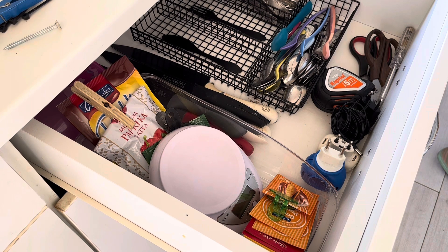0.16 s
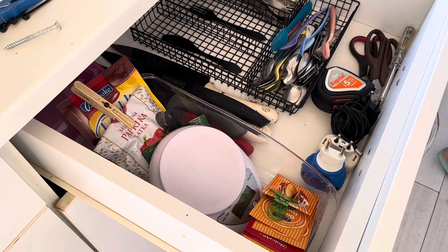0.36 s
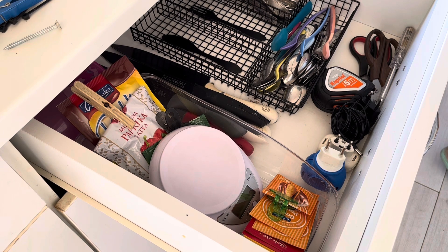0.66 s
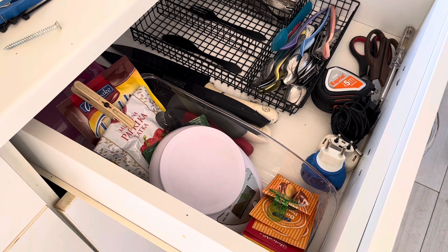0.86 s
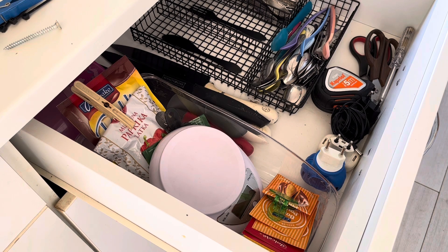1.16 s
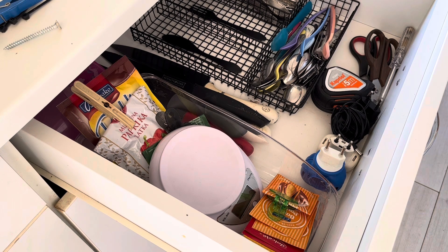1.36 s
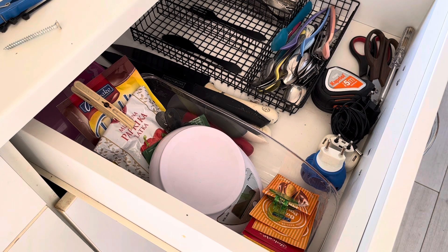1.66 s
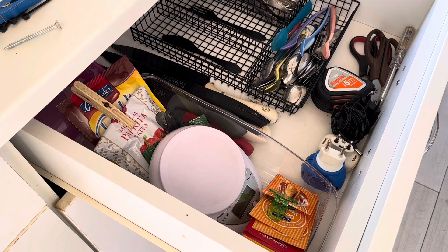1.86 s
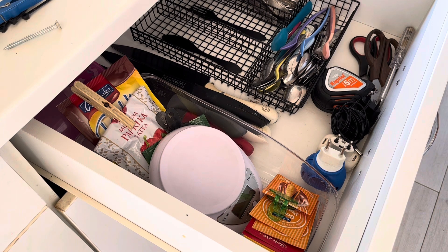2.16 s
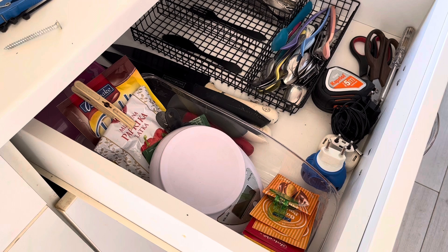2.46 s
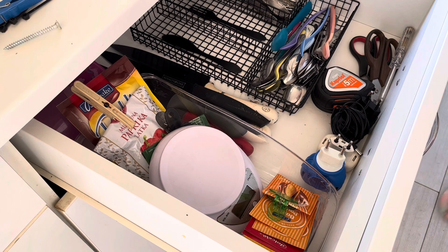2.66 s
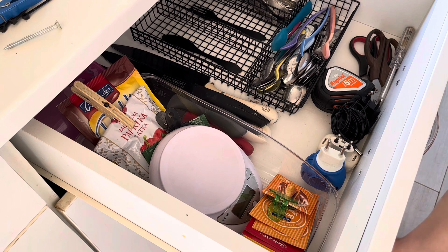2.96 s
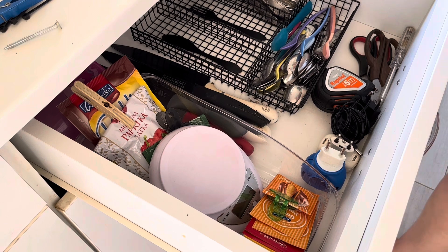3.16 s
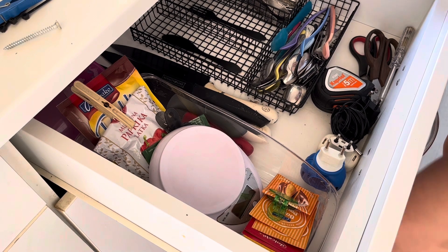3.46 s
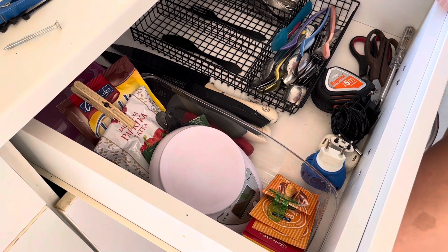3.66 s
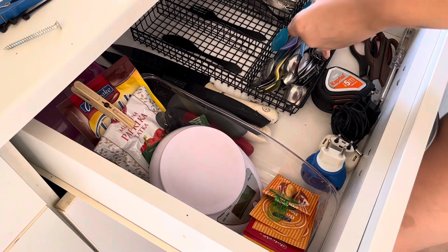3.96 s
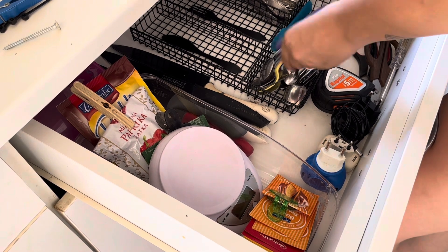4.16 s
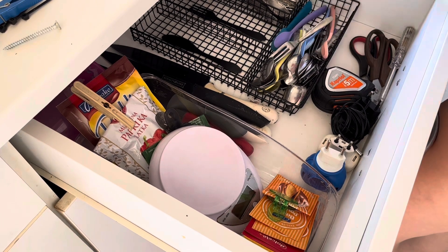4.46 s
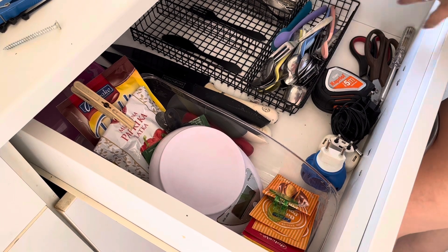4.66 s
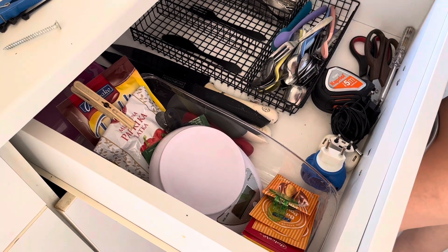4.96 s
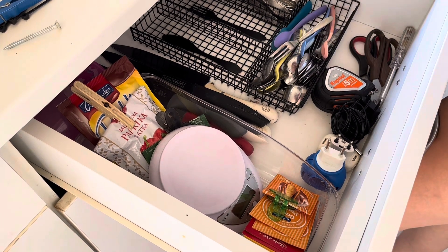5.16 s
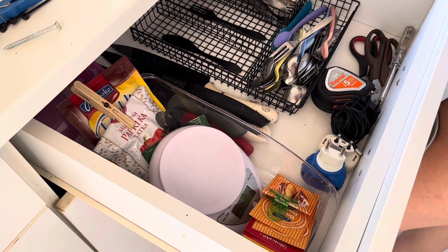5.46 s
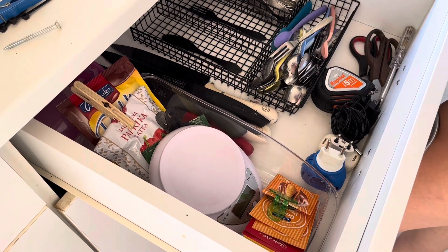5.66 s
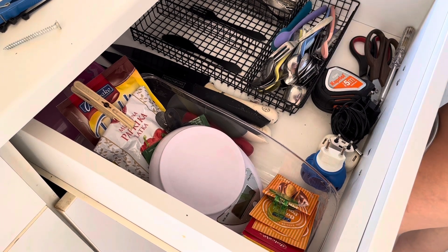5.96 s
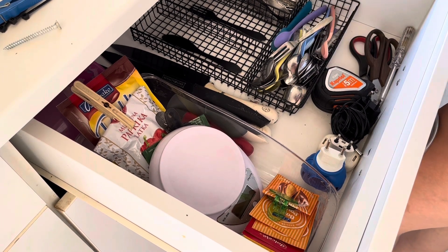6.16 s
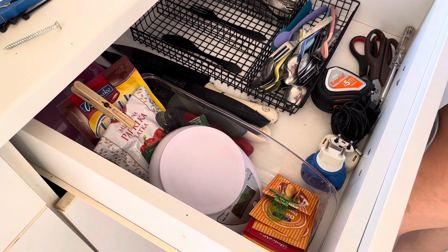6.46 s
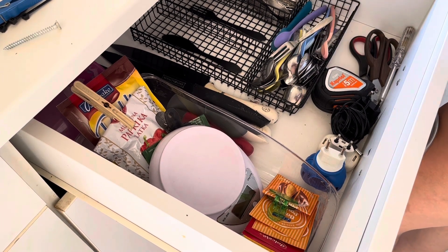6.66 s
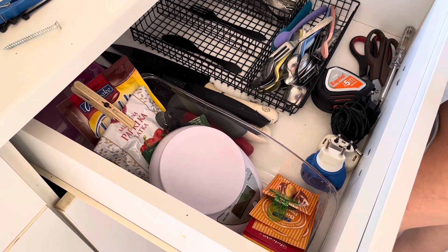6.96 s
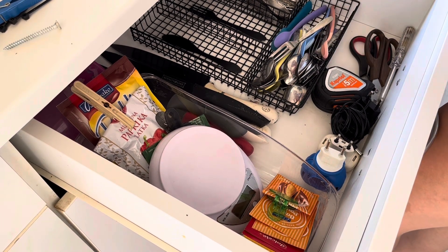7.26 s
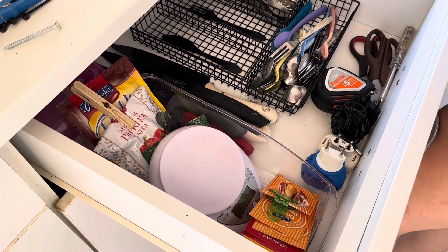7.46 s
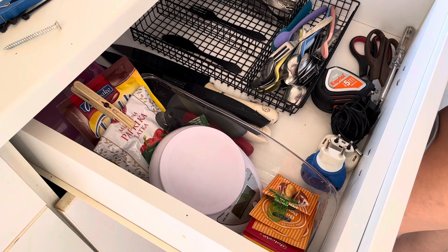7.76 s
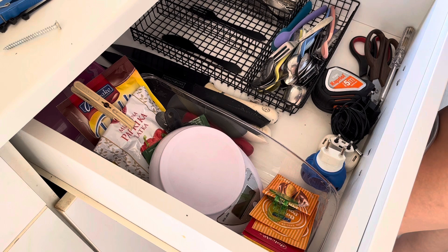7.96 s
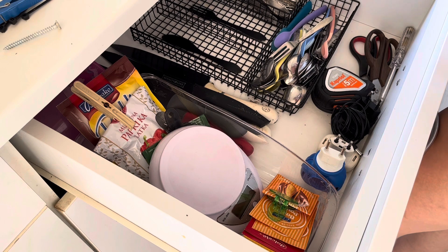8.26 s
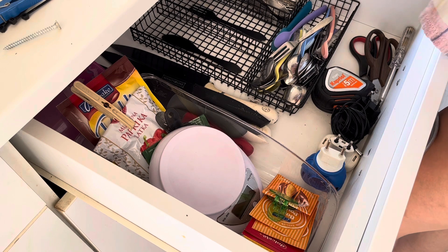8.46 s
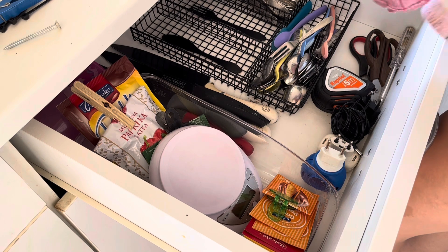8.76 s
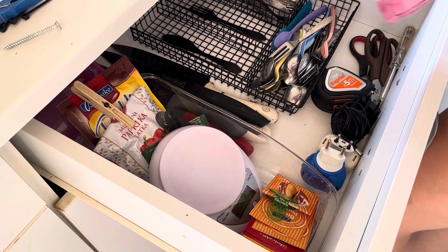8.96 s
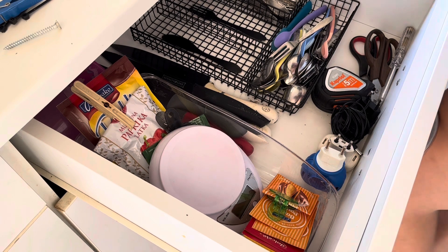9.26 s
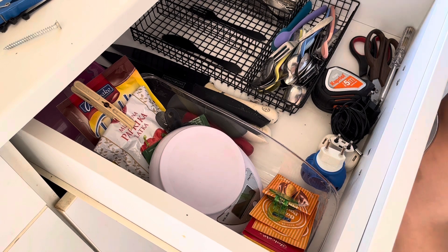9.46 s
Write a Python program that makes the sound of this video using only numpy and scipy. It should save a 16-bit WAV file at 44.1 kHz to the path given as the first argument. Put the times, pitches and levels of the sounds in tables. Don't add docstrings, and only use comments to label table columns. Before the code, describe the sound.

Thin steel cutlery handled close to the microphone in a hard-walled kitchen. Handfuls jangle and tumble, the wooden drawer rumbles and knocks, then pieces drop hard with sharp, bouncing clatters. Later come separate taps and short bright rings, and near the end a spoon scrapes along wires. An appliance drones in the background throughout.

```python
import sys
import numpy as np
from scipy import signal
from scipy.fft import rfft, irfft
from scipy.io import wavfile
from scipy.ndimage import uniform_filter1d, minimum_filter1d

SR = 44100
rng = np.random.default_rng(int(sys.argv[2]) if len(sys.argv) > 2 else 0)


def undo_db(level):
    steps = np.asarray(level, float) / 20
    return 10 ** steps


def store_pcm(level_fs):
    pcm = np.round(np.clip(level_fs, -1, 1) * 32767).astype(np.int16)
    wavfile.write(sys.argv[1], SR, np.atleast_2d(pcm).T)


N = 423351


def rms_one(x):
    return x / np.sqrt(np.mean(x ** 2) + 1e-20)


def at_hz(points, hz):
    point_hz, value = np.transpose(points)
    return np.interp(np.log(hz), np.log(point_hz), value)


def band(x, low_hz, high_hz):
    return signal.sosfilt(signal.butter(2, [low_hz, high_hz], "band", fs=SR, output="sos"), x)


def resonance(x, hz, width_hz):
    r = np.exp(-np.pi * width_hz / SR)
    poles = [1, -2 * r * np.cos(2 * np.pi * hz / SR), r * r]
    return signal.lfilter([(1 - r * r) / 2, 0, (r * r - 1) / 2], poles, x)


def grains(per_s, spread_db, size):
    strength = undo_db(spread_db * np.minimum(rng.exponential(1, size), 4))
    strength = strength * rng.choice([-1, 1], size)
    return strength * (rng.random(size) < per_s / SR) + 1e-18


def lumps(size, span):
    smooth = uniform_filter1d(rng.standard_normal(size), size=span)
    return rms_one(uniform_filter1d(smooth, size=span))


def swell(s, rise, hold, fall):
    t = np.arange(0, N + 16, 16) / SR - s
    climb, sink = t / max(rise, .002), (max(hold, 0) - t) / max(fall, .002)
    gain = 10 ** np.minimum(np.minimum(climb, sink), 0)
    return np.repeat(gain, 16)[:N]


def struck(rows):
    out = np.zeros(N + SR)
    for s, hz, level_db, t60, rise in rows:
        t = np.arange(min(int(t60 * SR), SR // 2)) / SR
        rattle = undo_db(3.5 * lumps(SR // 2, span=300)[:len(t)])
        decay = undo_db(level_db - 60 * t / t60) * np.clip(t / rise, 0, 1)
        out[round(s * SR):][:len(t)] += rattle * decay * np.sin(2 * np.pi * hz * t)
    return out[:N]


# frequency [Hz], density [dB per Hz].
DRONE_SPECTRUM = [(24, -42), (40, 9.5), (96, 7), (345, 10), (615, 12.5), (770, 9.5), (1240, 6), (1950, 2.5),
                  (2150, 5.5), (3060, -15), (3650, -66.5), (5440, -29), (10200, -4), (14000, -38),
                  (16000, -23)]
# frequency [Hz], width [Hz], level
# [dB].
HUM_LINES = [(198.2, 2.9, -68), (491, 11, -61.5), (549, 3.6, -71), (600, 10, -58.5), (638, 3, -60.5),
             (848, 3.6, -66), (930, 2.6, -65), (1050, 2.1, -63.5), (1200, 9.2, -62.5), (1258, 6, -65.5),
             (1300, 2.8, -64), (1196, 500, -52), (1950, 5.6, -63), (2964, 110, -61.5)]
# time [s], gain [dB].
DRONE_SWELL = [
    (0, 1.5),
    (4.2, 0),
    (5.3, 2),
    (6.8, 0.5),
    (7.7, 2.5),
    (8.4, -1),
    (9.6, 3.5),
]


def drone():
    white = rng.standard_normal((3, N))
    edges = 42 * 2 ** np.arange(0, 8.7, .5)
    broad = np.zeros(N)
    for k, (low, high) in enumerate(zip(edges, edges[1:])):
        broad += undo_db(at_hz(DRONE_SPECTRUM, np.sqrt(low * high))) * band(white[k % 2], low, high)
    hum = sum(undo_db(db) * rms_one(resonance(white[2], hz, width)) for hz, width, db in HUM_LINES)
    swell_s, swell_db = np.transpose(DRONE_SWELL)
    waxing = undo_db(np.interp(np.arange(N) / SR, swell_s, swell_db))
    return waxing * (undo_db(-48) * rms_one(broad) + hum)


# frequency [Hz], t60 [s].
KITCHEN_T60 = [(300, 0.18), (2000, 0.32), (6000, 0.32), (14000, 0.24)]


def kitchen(x, count=4):
    t = np.arange(SR // 2) / SR
    edges = 70 * 2 ** np.arange(9.)
    edges[-1] = 17500
    place = np.arange(N) // (SR // 8) % count
    out = np.zeros(N)
    for k in range(count):
        tail = np.zeros(len(t))
        for low, high in zip(edges, edges[1:]):
            tail += band(rng.standard_normal(len(t)), low, high) * undo_db(-60 * t / at_hz(KITCHEN_T60, low * 1.6))
        tail *= np.clip((t - .002) / 0.0042, 0, 1)
        here = uniform_filter1d(1.0 * (place == k), size=900)
        out += signal.fftconvolve(x * here, tail / np.sqrt(np.sum(tail ** 2)))[:N]
    return out


# frequency [Hz], width [Hz], level [dB].
PANEL_MODES = [(180.5, 13.4, 4), (249.3, 7.4, 2.5), (280, 18, -0.5), (318.5, 34, -1), (403, 72, -1.5),
               (434, 49, 5.5)]
# time [s], boom [dB], hold [s], panel centre [Hz], knock share [dB].
SHAKES = [(0.0, -46, 0.02, 280, -12), (0.969, -28.5, 0.14, 260, 0), (1.103, -24, 0.013, 294, -8),
          (1.12, -29.5, 0.028, 183, -18), (1.29, -46.5, 0.13, 363, -3), (1.418, -46, 0.01, 404, -10),
          (2.258, -43, 0.012, 397, -9), (2.826, -39.5, 0.072, 435, -18), (3.324, -41.5, 0.012, 387, -10),
          (3.696, -42, 0.0019, 374, -24), (3.865, -45, 0, 370, -27), (4.09, -35, 0.02, 330, 5),
          (4.163, -28.5, 0.02, 241, -4.5), (4.238, -39.5, 0.048, 251, -19), (9.14, -49, 0.11, 410, 6),
          (9.273, -49.5, 0.026, 417, 13.5), (9.44, -54, 0.1, 394, -18.5)]
# time [s], level [dB], hold [s].
RUMBLES = [
    (0.0, -46, 0.012),
    (0.976, -36, 0.18),
    (2.26, -53, 0.093),
    (3.356, -56, .04),
    (4.08, -42, .01),
]


def drawer():
    rise, fall = 0.036, 0.073
    rough, out = grains(1500, 2.65, N), np.zeros(N)
    panels = np.array([undo_db(db) * rms_one(resonance(rough, hz, width)) for hz, width, db in PANEL_MODES])
    panel_hz = np.array(PANEL_MODES)[:, 0]
    knock = rms_one(band(rough, 356, 1080))
    for hz, width_hz, db in [(940, 100, -5), (1245, 360, -7.5), (730, 41, -17)]:
        knock = knock + undo_db(db) * rms_one(resonance(rough, hz, width_hz)) 
    knock = rms_one(knock)
    rumble = rms_one(band(band(rough, 40, 154), 40, 154))
    for s, boom_db, hold, centre_hz, knock_db in SHAKES:
        near = np.exp(-(np.log(panel_hz / centre_hz) / 0.3) ** 2)
        shaken = near @ panels / np.sqrt(np.sum(near ** 2)) + undo_db(knock_db) * knock
        out += undo_db(boom_db) * swell(s, rise, hold, fall) * shaken
    for s, db, hold in RUMBLES:
        out += undo_db(db) * swell(s, rise, hold, fall) * rumble
    return out


# time [s], frequency [Hz], level [dB], t60 [s].
KNOCKS = [
    (1.016, 327, -16.5, .12),
    (1.07, 292, -19, 0.089),
    (1.1, 289, -16.5, 0.14),
    (1.142, 456, -19, 0.13),
    (4.08, 756, -11, .04),
    (4.176, 326, -24, 0.11),
    (4.177, 1250, -12.5, 0.063),
]


def knocks():
    return struck([(*row, .003) for row in KNOCKS])


# height of the slide [s], bright level [dB], body share [dB], fade of 20 dB [s].
SLIDES = [(0.0, -43.5, 2.5, 0.1), (.32, -44.5, -25, 0.47), (0.449, -36.5, 8, 0.24), (.77, -51, 4, -1.05),
          (.84, -48.5, 9.5, -0.57), (1.04, -43.5, 13, 0.16), (1.169, -39, 7.5, 0.21), (1.42, -23, -11, 0.1),
          (1.66, -33, 2, 0.12), (1.82, -29, -8, 0.14), (2.19, -42, 2, 0.28), (2.55, -43, 2.5, 0.12),
          (2.8, -34.5, 0, 0.02), (2.859, -32, 2.5, 0.11), (3.18, -56.5, 10, 0.8), (3.5, -32, -10, 0.14),
          (4.25, -26, -8, 0.0849), (4.97, -25, 2, -0.03), (5.05, -39, -3.5, 0.28), (5.36, -44.5, -4, -0.37),
          (5.68, -44.5, 1, 0.15), (6.15, -43, -4, 0.6), (6.9, -55.5, 7, 0.7), (7.425, -28, -1.5, 0),
          (7.54, -26, -24, 0.0252), (7.9, -36.5, -4, 0.36), (8.26, -38.5, 0.5, 0.18), (8.735, -29, 0, 0.02),
          (8.85, -27, -8, 0.12), (9.1, -27.5, 1, 0.25), (9.23, -32, 7.5, 0.14), (9.33, -23, -9, 0.06),
          (9.59, -50, -49, 4)]


def jangle(count=64):
    bright_gain, body_gain = undo_db(-67), undo_db(-78)
    for s, level_db, share_db, fade in SLIDES:
        fade = max(fade, .045)
        slide = undo_db(level_db) * swell(s, 0.77 * fade, 0, fade)
        bright_gain = bright_gain + slide
        body_gain = body_gain + undo_db(share_db) * slide
    touches, dealt = grains(9000, 2.5, N), rng.integers(0, count, N)
    steel = np.zeros(N)
    for k, hz in enumerate(rng.uniform(2970, 16000, count)):
        steel += resonance(touches * (dealt == k), hz, 190)
    steel = rms_one(steel) + 2.5 * rng.standard_normal(N)
    bright = band(steel, 6300, 14000)
    body = band(steel[::-1], 2800, 6300)
    return bright_gain * rms_one(bright) + body_gain * rms_one(body)


def scrape():
    hollow = rms_one(resonance(rng.standard_normal(N), 4670, 1200))
    return undo_db(-23) * swell(9.2, 0.22, 0.049, 0.088) * hollow


# time [s], level [dB], frequency [Hz].
CLINKS = [(3.339, -40, 8000), (2.255, -29, 3130), (4.075, -16.5, 4300), (4.95, -27, 2160),
          (5.715, -34, 6070), (5.765, -28.5, 1900), (6.034, -28.5, 4420), (6.033, -27, 9160),
          (6.226, -26, 8550), (6.549, -27.5, 5870), (6.775, -43, 5450), (6.276, -35, 8800),
          (6.868, -35.5, 5800), (7.177, -30, 4530), (7.255, -45, 4930), (7.93, -29, 1470),
          (8.115, -41, 1490), (9.0, -29, 5740)]


def clinks():
    out, t = np.zeros(N), np.arange(SR // 5) / SR
    for s, level_db, hz in CLINKS:
        chatter = rms_one(resonance(rng.standard_normal(len(t)), hz, 350))
        out[round(s * SR):][:len(t)] += undo_db(level_db - 60 * t / 0.25) * chatter
    return out


# time [s], frequency [Hz], level [dB],
# audible length [s].
EARLY_PINGS = [(0.171, 10480.0, -41, 0.044), (0.279, 4190.0, -26, 0.02), (0.279, 5560.0, -24, 0.044),
               (0.279, 13220.0, -23, 0.023), (0.284, 6840.0, -19, 0.029), (0.331, 5600.0, -25, 0.026),
               (0.433, 5000.0, -29, 0.029), (0.432, 8430.0, -16, 0.026), (0.435, 13910.0, -19, 0.041),
               (0.441, 15080.0, -21, 0.032), (0.47, 10790.0, -23, 0.038), (0.473, 9840.0, -24, 0.087),
               (1.045, 7620.0, -32, 0.029), (1.097, 9520.0, -32, 0.026), (1.117, 15650.0, -42, 0.064),
               (1.158, 10710.0, -36, 0.038), (1.207, 2770.0, -32, 0.032), (1.347, 13810.0, -26, 0.029),
               (1.422, 15540.0, -23, 0.044), (1.588, 4790.0, -21, 0.078), (1.591, 8040.0, -18, 0.026),
               (1.675, 9400.0, -24, 0.032), (1.692, 5020.0, -30, 0.052), (1.701, 8050.0, -24, 0.067),
               (2.04, 14740.0, -22, 0.026), (2.04, 15570.0, -22, 0.02), (2.049, 3240.0, -27, 0.02),
               (2.064, 1540.0, -33, 0.055), (2.247, 5320.0, -28, 0.026), (2.258, 4590.0, -30, 0.032),
               (2.789, 6240.0, -36, 0.026), (2.853, 1640.0, -34, 0.032), (3.184, 1480.0, -31, 0.035),
               (3.184, 9760.0, -21, 0.02), (3.184, 13270.0, -27, 0.029), (3.498, 5030.0, -26, 0.029),
               (3.498, 5700.0, -25, 0.023), (3.498, 7930.0, -25, 0.026), (3.498, 8540.0, -22, 0.049),
               (3.498, 9750.0, -21, 0.064), (3.498, 15660.0, -26, 0.023), (3.512, 11480.0, -32, 0.055),
               (3.518, 5900.0, -31, 0.032), (3.567, 8490.0, -37, 0.052), (4.11, 8370.0, -19, 0.041),
               (4.11, 14820.0, -21, 0.032), (4.148, 11390.0, -20, 0.064), (4.151, 13570.0, -18, 0.035),
               (4.212, 12330.0, -32, 0.038), (4.899, 8400.0, -34, 0.029)]
# time [s], frequency [Hz], level [dB], audible length [s].
LATE_PINGS = [(5.764, 9160.0, -22, 0.02), (6.034, 4790.0, -30, 0.075), (6.052, 9230.0, -33, 0.049),
              (6.876, 10990.0, -37, 0.032), (6.92, 15010.0, -25, 0.026), (6.963, 5530.0, -35, 0.052),
              (7.175, 5930.0, -29, 0.026), (7.175, 8440.0, -20, 0.02), (7.175, 10740.0, -13, 0.07),
              (7.175, 11840.0, -16, 0.023), (7.175, 13200.0, -17, 0.041), (7.198, 12000.0, -25, 0.122),
              (7.216, 13970.0, -30, 0.055), (7.262, 13240.0, -40, 0.064), (7.422, 1950.0, -36, 0.055),
              (7.425, 12030.0, -23, 0.084), (7.427, 10740.0, -30, 0.044), (7.442, 9880.0, -17, 0.041),
              (7.442, 14930.0, -25, 0.02), (7.462, 13930.0, -23, 0.102), (7.465, 15230.0, -27, 0.078),
              (7.512, 8450.0, -23, 0.038), (7.761, 10950.0, -27, 0.026), (7.93, 14530.0, -17, 0.058),
              (7.93, 15200.0, -13, 0.055), (7.953, 5250.0, -32, 0.041), (8.115, 1430.0, -33, 0.052),
              (8.141, 15690.0, -25, 0.049), (8.144, 8760.0, -18, 0.046), (8.144, 13970.0, -23, 0.023),
              (8.298, 13050.0, -19, 0.046), (8.301, 3550.0, -29, 0.038), (8.504, 12030.0, -30, 0.032),
              (8.545, 8590.0, -32, 0.029), (8.76, 15690.0, -26, 0.049), (8.763, 14000.0, -26, 0.044),
              (8.797, 5200.0, -38, 0.07), (8.992, 8380.0, -19, 0.02), (8.992, 9470.0, -20, 0.026),
              (8.995, 12500.0, -24, 0.049), (9.233, 13170.0, -22, 0.026), (9.236, 15030.0, -25, 0.02),
              (9.288, 8610.0, -20, 0.029), (9.546, 6680.0, -36, 0.058)]


def pings():
    return struck([(s, hz, db + 2.5, 2.2 * length, 0.0011) for s, hz, db, length in [*EARLY_PINGS, *LATE_PINGS]])


# time [s], peak [dB], frequency [Hz].
TICKS = [(0.2884, 0.5, 6960), (2.5227, -20.5, 9900), (2.7496, -21, 10000), (3.1051, -9, 8500),
         (3.15, -23, 8800), (3.3867, -30, 8160), (3.427, -11, 7700), (4.087, 1, 11200), (4.1812, 3, 11240),
         (5.1894, -21, 7140), (5.3393, -40, 5390), (5.4544, -32, 8230), (5.5473, -27, 10700),
         (5.7418, -23, 8900), (6.1559, -23, 5340), (6.1874, -21, 8730), (6.4197, -22, 7900),
         (6.4627, -22, 4840), (6.481, -15, 8600), (6.6154, -24, 9500), (8.7314, -11, 8800),
         (9.2359, -5, 13200), (9.4494, -48, 7470), (9.5287, -24, 10500)]


def ticks():
    partners = [(1.0, -7.5), (2.1, -11), (0.41, -18)]   # (pitch ratio, dB)
    rows = []
    for s, db, hz in TICKS:
        for ratio, share_db in partners:
            rows.append((s, min(hz * ratio, 15600), db + share_db, 0.018, .0003))
    return struck(rows)


def modes(hz, gain, t60, size):
    step = np.exp(-2j * np.pi * np.arange(size // 2 + 1) / size)
    r, w = undo_db(-60 / (t60 * SR))[:, None], 2 * np.pi * hz[:, None] / SR
    return gain @ (np.sin(w) * step / (1 - 2 * r * np.cos(w) * step + (r * step) ** 2))


def causal(db):
    folded = irfft(db * np.log(10) / 20)
    folded[1:len(folded) // 2] *= 2
    folded[len(folded) // 2 + 1:] = 0
    return np.exp(rfft(folded))


SET_HZ = [4800, 5650, 6900, 8020, 8430, 9450, 9860, 10740, 11390, 12010, 13200, 13940, 14850, 15170]


def landing(low_db, mid_db, top_db, flurry, rise, size=8192, count=120):
    t, hz = np.arange(size) / SR, np.arange(size // 2 + 1) * SR / size + 1
    colour = [(250, low_db - 49.0), (600, low_db + 5), (1000, low_db + 3.5), (2100, low_db + 8.5),
              (5500, mid_db + 13.5), (9500, 2.7), (14000, top_db + 9.0), (17000, top_db + 2.0)]
    shape = undo_db(-60 * t / np.clip(flurry, .004, .3)) * np.clip(t / rise, 0, 1) ** 0.86 * (t < .15)
    shape *= 1 + 0.8 * np.exp(1 - (t + rise) / 0.0014)
    strikes = 1.54 * grains(9000, 2.86, size) * shape * undo_db(2.4 * lumps(size, span=110))
    strikes[0] = 2.2 * np.exp(-rise / 0.0037)
    strengths = undo_db(3 * rng.standard_normal(count)) * rng.choice([-1, 1], count)
    shared_hz = rng.choice(SET_HZ, count) + 70 * rng.standard_normal(count)
    own_hz = rng.uniform(3000, 15800, count)
    pitches = np.where(rng.random(count) < .55, shared_hz, own_hz)
    steel = modes(pitches, strengths, rng.uniform(.006, .022, count), size)
    steel *= undo_db(-6) / np.sqrt(np.mean(np.abs(steel) ** 2))
    bounces = rfft(strikes)
    lumps_db = 10 * np.log10(uniform_filter1d(np.abs(bounces) ** 2, size=25) + 1e-12)
    crack = causal(at_hz(colour, hz) - .45 * lumps_db)
    sound = irfft(bounces * crack * (1 + steel)) * np.cos(t / t[-1] * np.pi / 2)
    return sound / np.sqrt(8 * uniform_filter1d(sound ** 2, size=130).max())


# time [s], peak [dB], weight [dB], flurry t60 [s].
TUMBLES = [(0.278, -1, -21.5, 0.26), (0.3387, -6, -21, .34), (0.4329, 0, -23, 0.23), (1.04, -16, 2.5, .35),
           (1.1389, -8.5, 1, 0.066), (1.341, -13.5, -14, 0.19), (1.499, -15, -19.5, 0.1),
           (1.6284, -2.5, -23.5, 0.11), (2.244, -12, -20, 0.15), (2.8378, -19.5, 0, 0.15),
           (2.8844, -13, -2.5, 0.16), (3.388, -24.5, -7, .36), (3.428, -17, -10, 0.28),
           (4.1087, -5, -20, 0.21), (4.739, -35.5, -13, 0.35), (4.943, -1, -17.5, 0.17),
           (4.978, -2, -17.5, 0.12), (5.385, -30, -5.5, 0.094), (7.424, -10.5, -15, 0.15),
           (7.4425, -6.5, -19.5, .36), (7.508, -8.5, -16, 0.19), (8.741, -3.5, -22, 0.083),
           (8.933, -18, -3, 0.27), (9.2361, -9.5, -12, 0.15)]


def tumbles():
    out = np.zeros(N + SR)
    for s, peak_db, weight, flurry in TUMBLES:
        rise = max(.014 + .0005 * (weight + 18), .004)
        sound = landing(weight, -4 + 0.58 * weight, -12 - 0.19 * weight, flurry, rise)
        out[round((s - .4 * rise) * SR):][:len(sound)] += undo_db(peak_db + 1.5) * sound
    return out[:N]


# time [s], peak [dB], weight as 2 kHz share [dB], # sparkle as 14 kHz share
# [dB], flurry t60 [s].
FIRST_DROPS = [(1.4239, -2, -22, -5, 0.12), (1.5852, 2.5, -23.5, -8.5, 0.082),
               (1.5979, 2, -17.5, -9, 0.037), (1.6768, -8, -20.5, -14, 0.24),
               (2.043, 3.5, -23, -15.5, 0.035), (2.0629, 5, -16, -4, 0.036),
               (2.2500, -3.5, -8.5, -27, 0.017), (3.1845, 0.5, -9, -7, 0.02), (3.497, 1, -22, -6, 0.022),
               (4.0705, 0.5, -6.5, -5, 0.061), (4.0794, 1, -0.5, -4.5, 0.022), (4.148, -0.5, -11, -6, 0.07),
               (4.1664, 2.5, -4.5, -11, 0.0096), (4.866, -7.5, -22, -16, 0.2)]
# time [s], peak [dB], weight [dB], sparkle [dB], flurry t60 [s].
LATER_DROPS = [(5.7628, -3, -13.5, -14, 0.025), (6.274, -7, -16, -12, 0.022), (6.919, -2.5, -17, -4, 0.038),
               (7.175, -1, -23.5, -5, 0.12), (7.76, -8.5, -12.5, -7, 0.14), (7.9117, -4, -5, 1.5, 0.038),
               (7.9303, 4.5, -17, -3, 0.034), (8.1458, -0.5, -22, -15, 0.015), (8.3, 2.5, -14, -6.5, 0.027),
               (8.3688, -5.5, -19, -3.5, 0.063), (8.504, -5.5, -23, -13, 0.013),
               (8.748, -1, -27, -10, 0.049), (8.995, 6, -25, -11.5, 0.016),
               (9.2874, 1.5, -20.5, -7.5, 0.085)]
# time [s], peak [dB], weight [dB], sparkle [dB], flurry t60 [s].
TAPS = [(1.776, -12, -18, -10, .05), (2.006, -23, -17, -15, 0.12), (2.522, -24, 3, -11, 0.22),
        (3.107, -11, -8, -5, 0.061), (3.6881, -22, -9, -8, 0.24), (5.648, -11, -4, -3, 0.027),
        (5.919, -17, -7, -12, 0.037), (6.005, -19, -3, -9, 0.19), (6.035, -10.5, -15, -12, 0.0098),
        (6.175, -12, -11, -9, 0.13), (6.2227, -12, -12.5, -12, 0.31), (6.454, -19, 1.5, -9, 0.12),
        (6.501, -8.5, -10, -18, 0.03), (6.55, -16, 4, -5, 0.027), (6.8788, -16.5, -11.5, -6.5, 0.3),
        (7.589, -12.5, -19, -8, 0.12), (7.889, -12, -12, -11, 0.036), (8.115, -11, -15, -9, 0.18),
        (8.4, -8.5, -9, -9, 0.019), (8.4833, -19, -42, -6, 0.028), (8.546, -15, -30, -13, 0.021),
        (8.6343, -11, -15, -5.5, 0.017), (8.6943, -19.5, -4, -9, 0.064), (9.542, -21.5, -22, -11, 0.23)]
# time [s], peak [dB], weight [dB], sparkle [dB].
TOUCHES = [(0.1712, -26, -16, -6), (0.706, -23.5, -5, -3), (.9538, -21, 3, -22), (1.909, -23.5, -14, -16),
           (2.7533, -24, -12, -13), (3.072, -29, -37, -26), (3.8603, -23, 1.5, -46),
           (4.418, -33.5, -26, -33), (4.478, -30, -43, -26), (4.527, -34.5, -25, -20),
           (4.8464, -21.5, -20, -18), (5.561, -26.5, -12, -11), (5.586, -20.5, -3, 1),
           (5.713, -38, -9, -24), (6.1325, -23.5, -24, -6), (6.4068, -23.5, 0, -9), (6.8104, -28, -15, -17),
           (7.845, -27, -19, -10), (8.2571, -77, -31, -18)]


def sharp_blows():
    out = np.zeros(N + SR)
    touches = [(*row, 0.07) for row in TOUCHES]
    for s, peak_db, weight, sparkle, flurry in [*FIRST_DROPS, *LATER_DROPS, *TAPS, *touches]:
        sound = landing(weight, -6 + 0.5 * weight, sparkle, flurry, 0.0019)
        out[round(s * SR):][:len(sound)] += undo_db(peak_db - 0.5) * sound
    return out[:N]


def scene():
    near, nicks, wood, ringing = sharp_blows() + tumbles(), ticks(), drawer(), pings()
    room = undo_db(-2.5) * kitchen(near + wood + undo_db(-9) * ringing + undo_db(1) * nicks)
    rest = jangle() + drone() + clinks() + scrape() + knocks()
    return (near + nicks + wood + ringing + room + rest)[None]


def low_pass(x):
    return signal.sosfilt(signal.butter(12, 16810, fs=SR, output="sos"), x)


def record(dry):
    cut = signal.sosfilt(signal.butter(4, 45, "high", fs=SR, output="sos"), dry)
    cut = signal.sosfilt(signal.cheby2(14, 40, 16080, fs=SR, output="sos"), cut)
    held = minimum_filter1d(np.minimum(1.05 / (np.abs(cut) + 1e-9), 1), size=48)
    limited = cut * uniform_filter1d(held, size=24)
    return low_pass(np.clip(limited, -.99, .99))


dry = scene()
out = record(dry)
store_pcm(out)
```